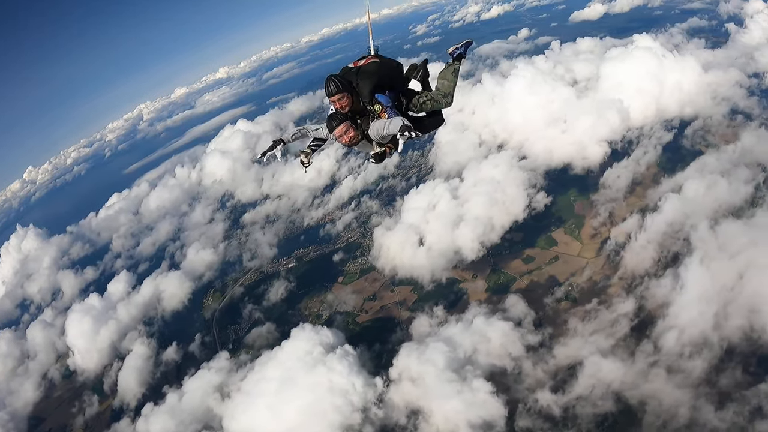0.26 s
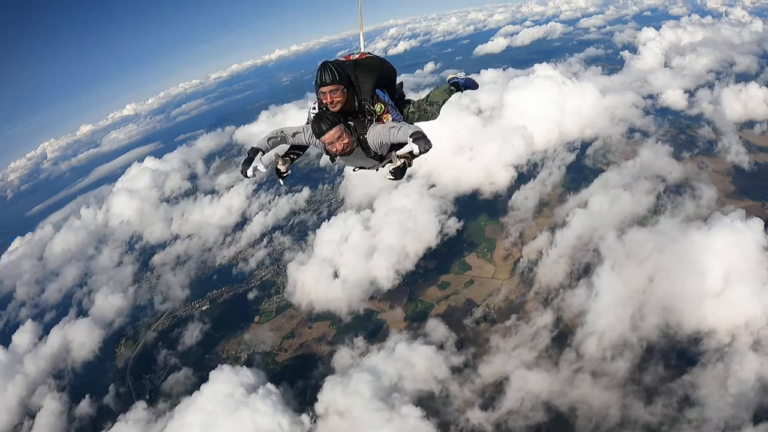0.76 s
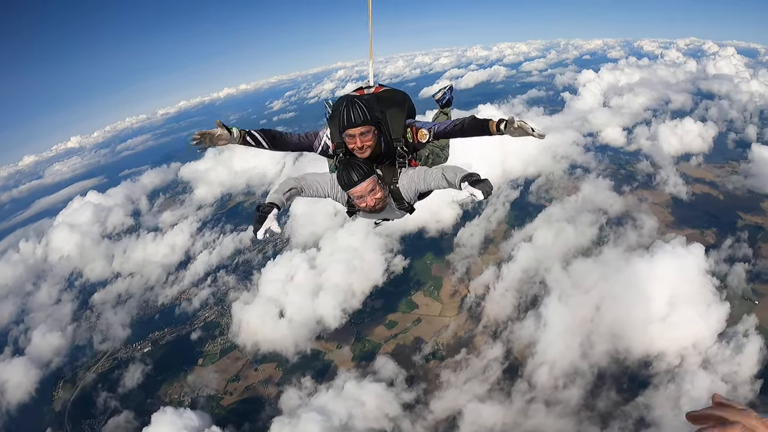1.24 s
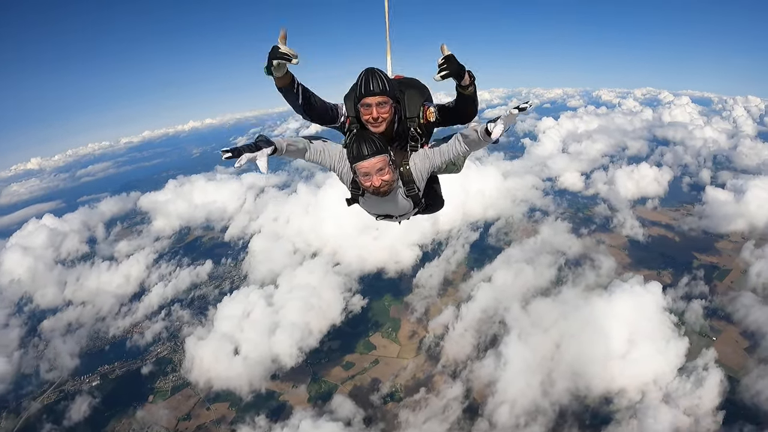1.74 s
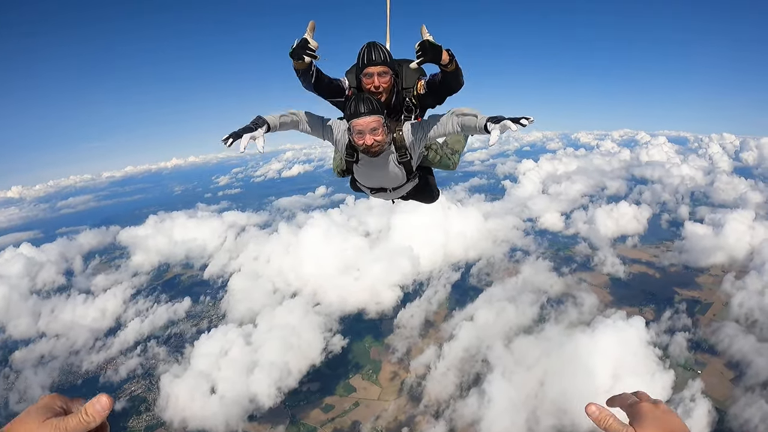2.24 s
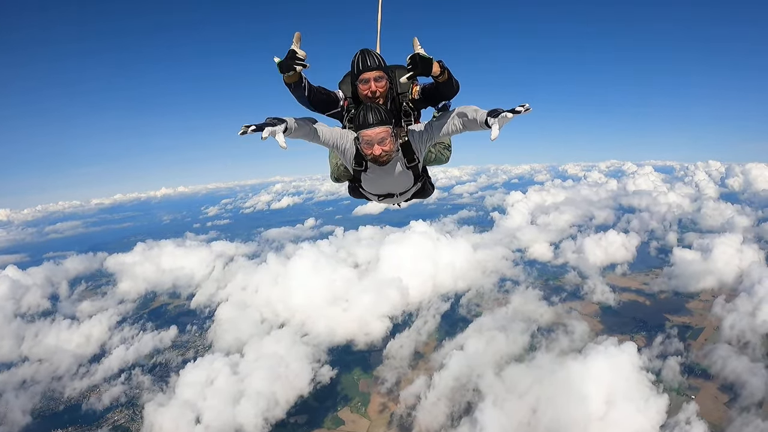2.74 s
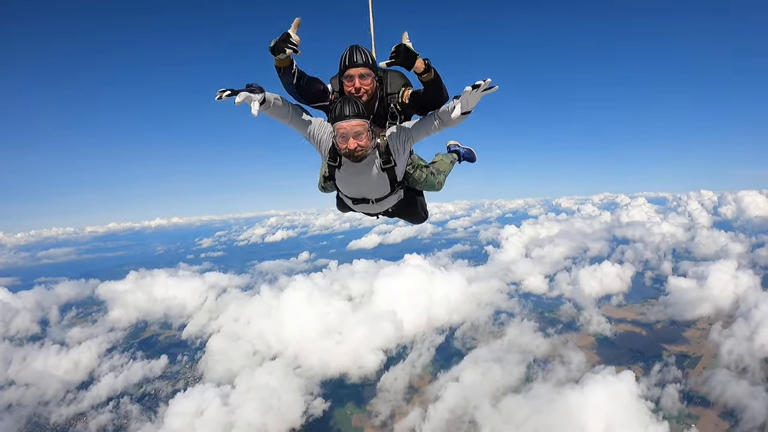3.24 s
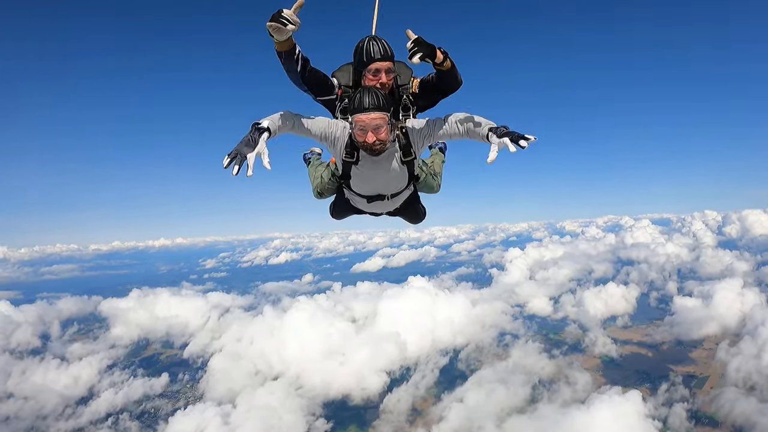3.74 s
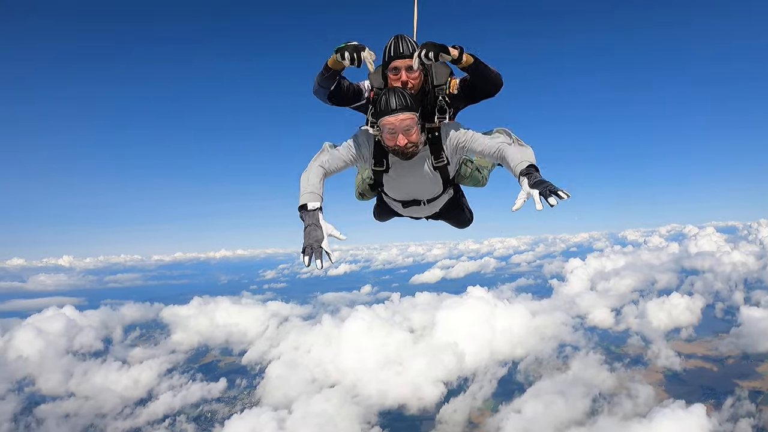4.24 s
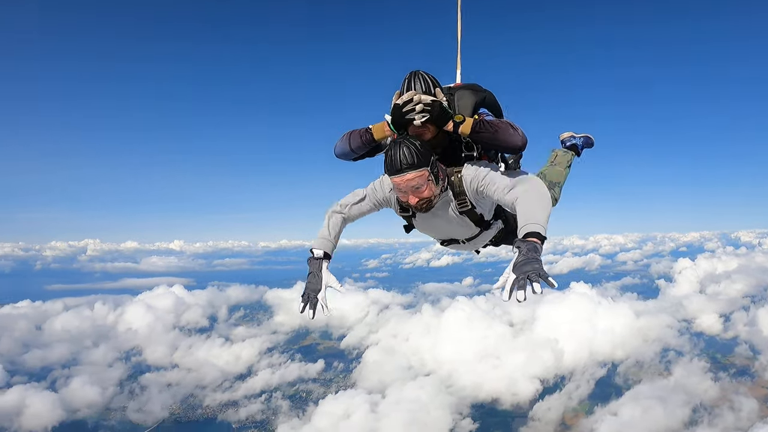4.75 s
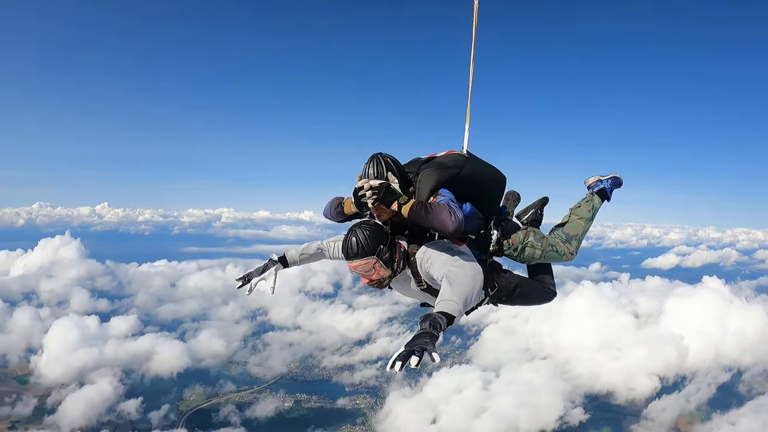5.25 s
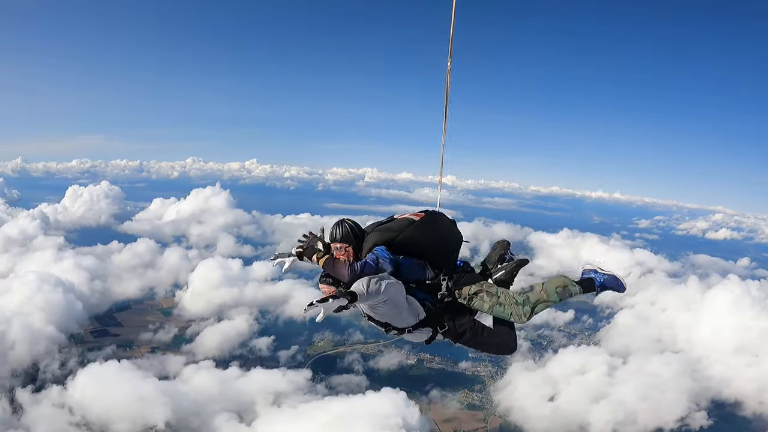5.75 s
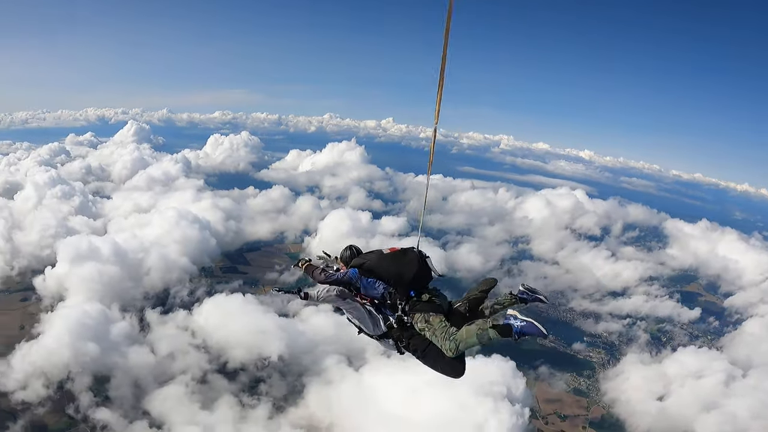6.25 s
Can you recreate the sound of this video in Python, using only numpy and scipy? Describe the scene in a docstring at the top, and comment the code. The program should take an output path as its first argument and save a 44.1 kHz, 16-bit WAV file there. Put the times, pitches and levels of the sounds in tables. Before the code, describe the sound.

In freefall high above the clouds, air beats directly on a small camera microphone without a pause. It starts as a dense roar over a deep rumble, then turns more ragged, with short wavering booms and sharp gusts. Small cracks pepper the wind all the way through, and a thin hiss flickers on top. The booming thins out late on and the rush becomes smoother, at much the same level.

```python
"""Freefall wind, point-blank on the port of a small camera microphone in open air.
Large eddies buffet the port with a low rumble and, shed in regular runs, boom in short surges.
Small eddies pass in fast uneven bursts that flash up the treble; the sharpest ones crack.
A thin hiss at the very top cuts in and out. The camera's fast gain control evens out the level."""
import sys
import numpy as np
from scipy import signal
from scipy.io import wavfile
from scipy.ndimage import uniform_filter1d

SR = 44100
rng = np.random.default_rng(int(sys.argv[2]) if len(sys.argv) > 2 else 0)


def store_pcm(level_fs):
    """Save levels as 16-bit WAV."""
    pcm = np.round(np.clip(level_fs, -1, 1) * 32767).astype(np.int16)
    wavfile.write(sys.argv[1], SR, np.atleast_2d(pcm).T)


N = 286650

# Airflow at the port as the head turns: t/s, boom level/dB, thud level/dB, rush level/dB
AIRFLOW = [(0.0, -18.5, -18, -18), (0.3, -21.5, -20, -13.5), (0.59, -19, -22, -18), (0.89, -19, -20, -16.5),
           (1.18, -17, -19.5, -18), (1.48, -24, -18.5, -17), (1.77, -20, -20, -17),
           (2.07, -18.5, -16.5, -20.5), (2.36, -17, -17.5, -19.5), (2.66, -18.5, -17.5, -19),
           (2.95, -16.5, -16.5, -18), (3.25, -22.5, -18, -20.5), (3.55, -15, -13.5, -20),
           (3.84, -20, -17, -23.5), (4.14, -14.5, -14.5, -20.5), (4.43, -24, -19, -26.5),
           (4.73, -19.5, -11.5, -20.5), (5.02, -16.5, -19.5, -23), (5.32, -23, -20.5, -25),
           (5.61, -24.5, -22.5, -24), (5.91, -22, -20.5, -23), (6.2, -22.5, -26, -22),
           (6.5, -18, -27.5, -21.5)]
# Spectra of the buffeting, deepest first: f/Hz, relative density/dB
THROB_SPECTRUM = [(14, -20), (20, -8.5), (30, -8), (42, 3.5), (60, -8.5), (78, -26)]
BOOM_SPECTRUM = [(30, -30), (50, 1.5), (95, 5), (140, -30)]
THUD_SPECTRUM = [(60, -30), (95, 3.5), (135, 1), (190, -2), (265, -11), (380, -30)]
RUSH_SPECTRUM = [(110, -30), (190, -2.5), (302, -0.5), (600, -8), (780, -50.5), (1320, -120)]
def buffeting(bursts, jumps, flicker_db):
    """Large eddies beat right on the microphone: a deep throb, a boom, a thud and a rush above them."""
    boom_db, thud_db, rush_db = in_time(AIRFLOW)
    throb_db = -21 - 1.5 * drift(3.7)
    surging = swells([(s, 2, length) for s, length, *_ in BOOMING_SURGES])
    duck_db = 2 * np.tanh(surging)  # the random rumble gives way while a surge runs
    throb = from_db(throb_db) * turbulence(THROB_SPECTRUM, bursts, 0, wander_db=7.5)
    boom = from_db(boom_db - duck_db) * turbulence(BOOM_SPECTRUM, bursts, 0, wander_db=0.1)
    thud = from_db(thud_db - duck_db) * turbulence(THUD_SPECTRUM, bursts, 0, wander_db=3.0)
    rush = turbulence(RUSH_SPECTRUM, bursts, 0.43 * jumps, wander_db=1.75)
    return throb + boom + thud + from_db(rush_db + 0.37 * flicker_db) * rush


# Regular runs of eddies: centre t/s, length/s, start f/Hz, end f/Hz, rms level at the centre/dB
BOOMING_SURGES = [(1.896, 0.094, 300, 290, -23), (2.081, .12, 79.5, 91, -21), (2.474, 0.095, 66.3, 49, -25),
                  (2.898, 0.13, 83, 96, -22), (3.2, .06, 147.5, 220, -16.5), (3.27, .07, 215, 240, -20.5),
                  (3.399, .12, 68.4, 106, -15), (3.48, .08, 179.7, 190, -15.5),
                  (3.536, 0.12, 85.4, 97, -15.5), (3.782, .18, 101.8, 105, -16.5),
                  (3.92, 0.092, 125.5, 160, -20), (4.098, .12, 77.9, 58, -16),
                  (4.325, .16, 60.4, 90, -18.5), (4.68, .14, 75.7, 67, -16), (4.82, .11, 123.1, 125, -16.5),
                  (4.927, 0.068, 82.3, 82, -21), (5.081, .08, 106.9, 94, -20), (6.17, .1, 80.8, 66, -23)]
def surges():
    """Eddies shed in a regular run boom as a wavering low tone that glides, swells and fades."""
    t, out = np.arange(N) / SR, np.zeros(N)
    wobble = 1 + 0.076 * drift(25.6)
    for s, length, from_hz, to_hz, db in BOOMING_SURGES:
        near = slice(int((s - 1.5 * length) * SR), int((s + 1.5 * length) * SR))
        offset = (t[near] - s) / length
        glide_hz = from_hz + (to_hz - from_hz) * np.clip(offset + .5, 0, 1)
        cycles = rng.random() + np.cumsum(glide_hz * wobble[near]) / SR
        out[near] += np.sqrt(2) * from_db(db) * bump(offset) * np.sin(2 * np.pi * cycles)
    return out


# Strength of the roar: t/s, level/dB
ROAR_LEVEL = [(0, -20.5), (.5, -22.5), (.75, -23.5), (.95, -19.5), (1.2, -23), (1.5, -22), (2.0, -26),
              (2.5, -26.5), (3.05, -27.5), (3.5, -31), (4.0, -31.5), (4.3, -31), (4.8, -29), (5.3, -34.5),
              (5.8, -29), (6.15, -25), (6.5, -25.5)]
# Spectrum of the roar: f/Hz, relative density/dB
ROAR_SPECTRUM = [(320, -30), (550, 3.5), (945, -2.5), (1500, -11.5), (1950, -37), (3300, -120)]
def roar(bursts, jumps, flicker_db):
    """Midrange turbulence, strongest while the microphone faces into the wind."""
    level_db = in_time(ROAR_LEVEL)[0] + 0.9 * flicker_db
    return from_db(level_db) * turbulence(ROAR_SPECTRUM, bursts, 0.29 * jumps, wander_db=0.5)


# Small eddies between the gusts: t/s, level/dB
EDDY_LEVEL = [(0, -37.5), (.3, -37), (.6, -38), (.95, -33.5), (1.2, -37.5), (1.6, -37.5), (2.0, -39),
              (2.7, -40), (3.25, -37.5), (3.6, -41.5), (4.4, -39), (5.0, -40), (5.45, -45), (5.85, -43),
              (6.0, -38.5), (6.17, -35.5), (6.35, -36.5), (6.5, -32)]
# Spectrum of the small eddies: f/Hz, relative density/dB
EDDY_SPECTRUM = [(820, -31), (1400, 2.5), (3580, -8), (5010, -16.5), (7810, -30), (9500, -38.5),
                 (11000, -60), (22000, -120)]
def small_eddies(bursts, jumps, flicker_db):
    """Small eddies skim the port and carry the treble, which flashes up with every gust."""
    level_db = in_time(EDDY_LEVEL)[0] + flicker_db
    return from_db(level_db) * turbulence(EDDY_SPECTRUM, bursts, jumps, wander_db=1.3)


# How deeply the bursts swing each band: f/Hz, swing per unit of burst/dB
BURST_SWING = [(200, 1.5), (600, 3), (1500, 5), (4000, 3.5), (10000, -1)]
def turbulence(spectrum, bursts, jumps, wander_db):
    """Eddies of all sizes: half-octave noise bands that burst together and wander singly; rms 1."""
    low_hz, high_hz = spectrum[1][0], spectrum[-2][0]
    edges = low_hz * np.sqrt(2) ** np.arange(np.ceil(2 * np.log2(high_hz / low_hz)) + 1)
    out, white = 0, rng.standard_normal((2, SR + N))  # one second of run-in
    white[:, SR:] += jumps
    white /= running_rms(white, SR // 4)  # jumps take their energy from the smooth flow
    for k, (low, high) in enumerate(zip(edges, edges[1:])):
        hz = np.sqrt(low * high)
        swing = from_db(at_hz(BURST_SWING, hz) * bursts + wander_db * drift(13.0))
        swing /= running_rms(swing, SR // 8)  # bursts share out the energy, they add none
        out += from_db(at_hz(spectrum, hz)) * swing * band(white[k % 2], low, high)[SR:]
    return rms_one(out)


# Raggedness of the flow: t/s, burst strength (0-2), crackle level against the smooth flow/dB
RAGGEDNESS = [(0, 0.62, -33.5), (1.0, 0.42, -19), (1.6, 0.42, -5), (2.3, 1.06, -7.5), (3.0, 1, -6.5),
              (3.6, 1.36, -31), (4.3, 1.07, -12.5), (5.0, 0.93, -16.5), (5.7, 1.24, -15.5),
              (6.0, 0.16, -15), (6.5, 0.74, -21)]
def ragged_flow():
    """Eddies pass in bursts at three speeds, with tiny uneven pressure jumps crowding into the bursts."""
    strength, crackle_db = in_time(RAGGEDNESS)
    passing = rms_one(0.031 * drift(26) + 0.52 * drift(130) + 1.5 * drift(288))
    bursts = strength * 2.22 * np.tanh(passing / 2)  # saturates, so no burst towers over the rest
    size_db = 2.3 * np.minimum(rng.exponential(1, N), 5)
    sizes = from_db(size_db) * rng.choice([-1, 1], N)
    jumps_per_s = 400 * from_db(3 * bursts)
    occurs = rng.random(N) < jumps_per_s / SR
    return strength, bursts, from_db(crackle_db) * rms_one(sizes * occurs)


# Gusts of small eddies over the port: centre t/s, rise before saturation/dB, length/s
PORT_GUSTS = [(1.442, 3.5, 0.015), (1.605, 11, 0.021), (2.232, 2.5, 0.055), (2.387, 3, 0.058),
              (2.792, 6.5, 0.014), (3.05, -2, 0.015), (3.085, 19, 0.026), (3.339, 3, 0.011),
              (3.5, 17, 0.028), (3.612, 23, 0.015), (3.889, 6, 0.23), (4.065, 14, 0.018),
              (4.509, 10, 0.016), (4.95, 13, 0.0083), (5.083, 5, 0.013), (5.287, 21, 0.013),
              (5.385, 11, 0.043), (5.515, 10, 0.041), (5.613, 10, 0.043)]
# Moments when the small eddies drop out: centre t/s, depth/dB, length/s
EDDY_LULLS = [(0.302, 3.5, 0.032), (1.377, 5, 0.018), (1.972, 10.5, 0.014), (2.189, 9, 0.022),
              (2.279, 10, 0.0086), (2.968, 16, 0.012), (3.115, 11, 0.024), (3.664, 14, 0.0083),
              (3.952, 7, 0.034), (4.037, 5, 0.019), (4.385, 8.5, 0.072), (4.923, 11, 0.02),
              (5.039, 6.5, 0.031), (5.108, 6, 0.02), (5.766, 7, 0.02)]
def gusts_and_lulls(strength, ceiling_db=10.5):
    """The flow rises in gusts, puffs around each loud crack and sinks in lulls; gives flicker and dips."""
    puffs_db = strength * swells([(s, 6, 0.0048) for s, *_ in LOUD_CRACKS])
    rise_db = ceiling_db * np.tanh((swells(PORT_GUSTS) + puffs_db) / ceiling_db)
    lesser_gusts_db = 0.5 * strength * drift(84)
    lull_db = swells(EDDY_LULLS)
    return rise_db + lesser_gusts_db - lull_db, lull_db


# Sharpest eddies to hit the port: t/s, middle peak/dB, dull peak/dB, bright peak/dB
LOUD_CRACKS = [(0.1997, -10, -15, -42), (0.252, -22, -26, -51), (0.3087, -18, -25, -41),
               (0.325, -18, -27, -43), (0.342, -22, -25, -40), (0.358, -25, -25, -43),
               (0.451, -13.5, -23, -45), (0.4858, -13, -25, -40), (0.505, -16, -25, -44),
               (0.559, -13, -25, -43), (0.5985, -20, -22, -44), (0.627, -22, -21, -45),
               (0.6434, -19, -25, -41), (0.661, -13, -28, -42), (0.6888, -16, -22, -42),
               (0.71, -22, -25, -38), (0.729, -24, -16, -42), (0.8215, -23, -25, -45),
               (0.852, -13, -24, -41), (1.1497, -10, -22, -42), (1.2213, -17, -22, -44),
               (1.2333, -6.5, -26, -34), (1.2841, -10, -11, -44), (1.305, -8, -14, -35),
               (1.34, -16, -28, -41), (1.3543, -12, -21, -33), (1.443, -17, -6, -42),
               (1.4996, -18, -24, -45), (1.523, -10, -25, -40), (1.537, -13, -22, -39),
               (1.586, -18, -24, -41), (1.6036, -11, -27, -37), (1.634, -20, -20, -41),
               (1.7082, -22, -25, -45), (1.7338, -14, -24, -45), (1.763, -12, -18, -47),
               (1.792, -13, -11, -43), (1.8576, -8, -13, -42), (1.947, -11, -24, -40),
               (1.9896, -15, -21, -47), (2.0614, -19, -16, -45), (2.069, -13, -24, -43),
               (2.1186, -18, -16, -46), (2.1563, -22, -27, -44), (2.174, -25, -14, -45),
               (2.2073, -19, -22, -43), (2.225, -10.5, -19, -35), (2.2426, -6.5, -18, -36),
               (2.2645, -12, -17, -42), (2.2993, -18, -25, -41), (2.332, -18, -27, -44),
               (2.367, -9.5, -13, -36), (2.38, -16, -11, -45), (2.39, -11, -10, -42), (2.405, -8, -26, -39),
               (2.463, -16, -19, -34), (2.5378, -14, -27, -52), (2.556, -13, -20, -43),
               (2.579, -25, -8, -54), (2.63, -13, -22, -31), (2.647, -15, -18, -43),
               (2.7414, -11, -26, -41), (2.7626, -17, -16, -43), (2.7942, -6, -24, -34),
               (2.8563, -12.5, -8, -46), (2.8803, -16, -14, -41), (2.9309, -8, -8, -37),
               (2.9812, -15, -29, -43), (3.007, -24, -19, -47), (3.0238, -22, -22, -43),
               (3.048, -16, -1, -46), (3.055, -12, -20, -38), (3.089, -16, -16, -41),
               (3.1355, -26, -11, -49), (3.243, -15, -31, -48), (3.2911, -19, -27, -46),
               (3.3147, -20, -16, -42), (3.3397, -12, -10, -41), (3.3899, -15, -9, -46),
               (3.3991, -21, -20, -48), (3.4245, -25, -20, -48), (3.451, -28, -16, -48),
               (3.464, -20, -18, -40), (3.481, -21, -24, -41), (3.4958, -17, -7, -38),
               (3.51, -12, -22, -43), (3.5363, -12, -26, -38), (3.548, -10, -33, -42),
               (3.5791, -12, -6, -42), (3.586, -14, -18, -46), (3.599, -18, -29, -45),
               (3.6185, -14, -13, -44), (3.6824, -12, -30, -40), (3.717, -19, -30, -43),
               (3.7364, -16, -20, -40), (3.7653, -6.5, -27, -41), (3.7962, -17, -25, -43),
               (3.806, -17, -32, -39), (3.817, -23, -18, -47), (3.8649, -10, -26, -45),
               (3.9164, -18, -19, -55), (3.9781, -13, -11, -40), (4.061, -14, -17, -33),
               (4.1668, -13.5, -11, -44), (4.201, -27, -18, -45), (4.2161, -26, -26, -47),
               (4.2646, -23, -10, -50), (4.329, -28, -14, -52), (4.412, -24, -17, -50),
               (4.5166, -28, -11, -48), (4.7184, -21, -21, -55), (4.748, -17, -28, -49),
               (4.7595, -13, -24, -41), (4.768, -11, -32, -41), (4.798, -17, -32, -48),
               (4.866, -22, -33, -41), (4.879, -23, -19, -53), (4.8945, -16, -27, -37),
               (4.9474, -22, -19, -40), (4.967, -24, -16, -43), (4.9943, -19, -13, -50),
               (5.0035, -14, -12, -43), (5.0184, -12, -11, -39), (5.061, -17, -32, -43),
               (5.089, -22, -9.5, -47), (5.15, -21, -32, -53), (5.1718, -17, -31, -42),
               (5.196, -13, -9, -43), (5.2437, -24, -27, -45), (5.2537, -31, -11, -44),
               (5.2627, -22, -24, -40), (5.284, -13, -6.5, -43), (5.3, -20, -16, -44),
               (5.3186, -23, -22, -43), (5.3307, -18, -24, -43), (5.38, -14, -27, -39),
               (5.4077, -10, -14, -42), (5.4212, -12, -18, -46), (5.4496, -26, -18, -49),
               (5.4694, -17, -20, -45), (5.487, -16, -31, -43), (5.507, -14, -29, -40),
               (5.519, -18, -27, -46), (5.5638, -20, -12, -42), (5.582, -19, -24, -44),
               (5.6106, -20, -18, -43), (5.619, -23, -24, -45), (5.6474, -8, -5, -44),
               (5.7102, -17, -29, -44), (5.739, -13, -9, -37), (5.8095, -14, -14, -43),
               (5.836, -28, -25, -46), (5.8581, -25, -28, -44), (5.9234, -18, -16, -46),
               (5.9346, -17, -7, -41), (5.979, -20, -22, -44), (6.0135, -16, -13, -43),
               (6.0308, -15, -16, -42), (6.092, -21, -24, -42), (6.116, -21, -24, -39),
               (6.142, -10, -26, -42), (6.164, -21, -26, -39), (6.27, -22, -26, -44),
               (6.341, -17, -22, -44), (6.376, -18, -20, -41)]
# Middle, dull, bright and top band: low f/Hz, high f/Hz, filter make-up/dB, fizz share, fizz length/s
CRACK_BANDS = [(935, 3220, 9, 0.19, 0.003), (470, 1150, 22.5, 0.1, 0.005), (5000, 9700, 8, 0.16, 0.0022),
               (9000, 11000, 7.5, 0.24, 0.002)]
def cracks(strength, lull_db, hiss_db, lesser_per_s=110):
    """Each sharp eddy is a pressure jump wrapped in a short fizz; lesser ones fall at random."""
    hiss_swing_db = hiss_db - hiss_db.mean()
    when, size, brightness = rng.random((round(lesser_per_s * N / SR), 3)).T
    at = (when * (N - 1)).astype(int)
    peak_db = -23.5 + 3.5 * (strength[at] - 1) - lull_db[at] + 5 * (2 * size - 1)
    bright_db = peak_db - 24 + 2 * (2 * brightness - 1) + 0.49 * hiss_swing_db[at]
    lesser = np.transpose([when * (N - 1) / SR, peak_db, peak_db, bright_db])
    s, *bands_db = np.vstack([LOUD_CRACKS, lesser]).T
    at = np.round(s * SR).astype(int)
    bands_db.append(bands_db[-1] - 9 + hiss_swing_db[at])  # the top band comes and goes with the hiss
    out, sign = 0, rng.choice([-1, 1], len(s))
    for db, (low_hz, high_hz, makeup_db, fizz_share, fizz_s) in zip(bands_db, CRACK_BANDS):
        jumps = np.zeros(N)
        jumps[at] = sign * from_db(db + makeup_db)
        fizz_envelope = signal.fftconvolve(jumps, np.hanning(round(fizz_s * SR)), "same")
        fizz = fizz_share * fizz_envelope * rng.standard_normal(N)
        snaps = band(jumps + fizz, low_hz, high_hz)
        out += band(snaps, 0.41 * low_hz, 1.82 * high_hz)  # steeper skirts
    return out


# Faint hiss at the very top of the treble: t/s, level/dB
HISS_LEVEL = [(0.05, -67), (0.92, -66), (1.99, -69.5), (2.03, -81), (2.06, -69), (2.56, -65.5),
              (2.6, -79.5), (2.63, -64), (2.65, -67.5), (2.94, -63.5), (2.96, -76), (3.08, -77),
              (3.11, -84.5), (3.28, -75.5), (3.31, -66), (3.37, -83.5), (3.51, -63.5), (3.6, -71),
              (3.63, -78), (3.81, -70.5), (3.85, -86), (3.9, -64), (3.94, -76.5), (4.01, -69), (4.29, -88),
              (4.7, -85), (5.23, -71), (5.3, -68.5), (5.5, -69), (5.9, -72.5), (6.04, -69.5), (6.45, -68.5)]
def top_hiss(hiss_db, bursts, jumps, flicker_db):
    """A thin hiss at the very top cuts in and out."""
    noise = rng.standard_normal(N) + 1.2 * jumps
    thin = band(band(noise, 9000, 13000), 8000, 17000)
    return from_db(hiss_db + 0.8 * bursts + 0.49 * flicker_db + 1.2 * drift(11)) * rms_one(thin)


def from_db(db):
    return 10 ** (np.asarray(db) / 20)


def rms_one(x):
    return x / np.sqrt(np.mean(x ** 2) + 1e-20)


def running_rms(x, samples):
    return np.sqrt(uniform_filter1d(x ** 2, size=samples))


def in_time(rows):
    s, *columns = np.transpose(rows)
    return [np.interp(np.arange(N) / SR, s, column) for column in columns]


def at_hz(points, hz):
    points_hz, db = np.transpose(points)
    return np.interp(np.log(hz), np.log(points_hz), db)


def band(x, low_hz, high_hz):
    return signal.sosfilt(signal.butter(2, [low_hz, high_hz], "band", fs=SR, output="sos"), x)


def drift(rate_hz, step=8, run_in=3000):
    """Random wander of spread 1: coarse noise through a double one-pole low-pass."""
    pole = np.exp(-2 * np.pi * rate_hz * step / SR)
    noise = rng.standard_normal(N // step + run_in + 2)
    slow = signal.lfilter([1], [1, -2 * pole, pole ** 2], noise)[run_in:]
    return np.interp(np.arange(N) / step, np.arange(len(slow)), rms_one(slow - slow.mean()))


def bump(offset):
    """Bell curve, one unit wide at half height."""
    return np.exp(-4 * np.log(2) * offset ** 2)


def swells(rows):
    t = np.arange(0, N + 32, 32) / SR
    bumps = sum(height * bump((t - s) / length) for s, height, length in rows)
    return np.interp(np.arange(N) / SR, t, bumps)


def scene():
    """Wind and cracks at the microphone port, with the thin hiss above them, in mono."""
    strength, bursts, jumps = ragged_flow()
    flicker_db, lull_db = gusts_and_lulls(strength)
    flow = bursts, jumps, flicker_db
    wind = buffeting(*flow) + roar(*flow) + small_eddies(*flow) + surges()
    port_cover = signal.butter(2, 5500, fs=SR, output="sos")  # dulls the finest eddies
    wind = signal.sosfilt(port_cover, wind)
    hiss_db = in_time(HISS_LEVEL)[0]
    return (wind + top_hiss(hiss_db, *flow) + cracks(strength, lull_db, hiss_db))[None]


def gain_control(x, target_db, share, attack_s, release_db_per_s):
    """Follows the peaks, falls back steadily and pulls the level part of the way to the target."""
    level_db = 20 * np.log10(np.abs(x) + 1e-3)
    fall_db = release_db_per_s * np.arange(N) / SR
    held_db = np.maximum.accumulate(level_db + fall_db) - fall_db
    start_db = held_db[:SR].mean()
    pole = np.exp(-1 / (attack_s * SR))
    smooth_db = signal.lfilter([1 - pole], [1, -pole], held_db - start_db) + start_db
    return x * from_db(share * (target_db - smooth_db))


def record(dry):
    """Inside the camera: fast gain control, rounded peaks, then a steep treble cut."""
    levelled = gain_control(dry[0], target_db=-7.5, share=0.6, attack_s=0.0027, release_db_per_s=154.5)
    rounded = 0.77 * np.tanh(levelled / 0.77)
    return signal.sosfilt(signal.butter(11, 12400, fs=SR, output="sos"), rounded)[None]


dry = scene()
out = record(dry)
store_pcm(out)
```